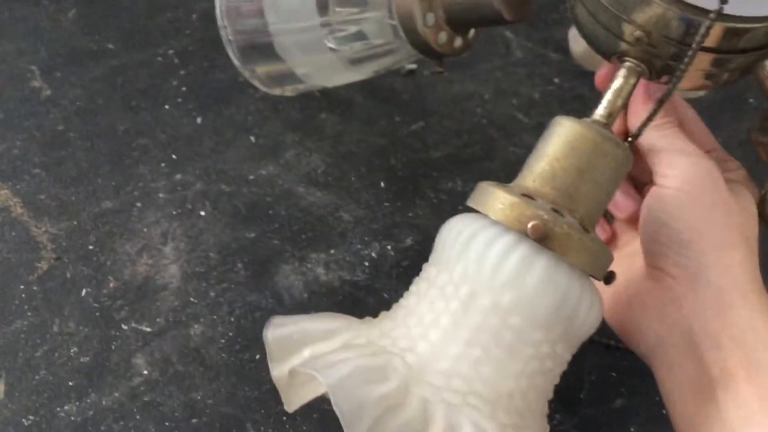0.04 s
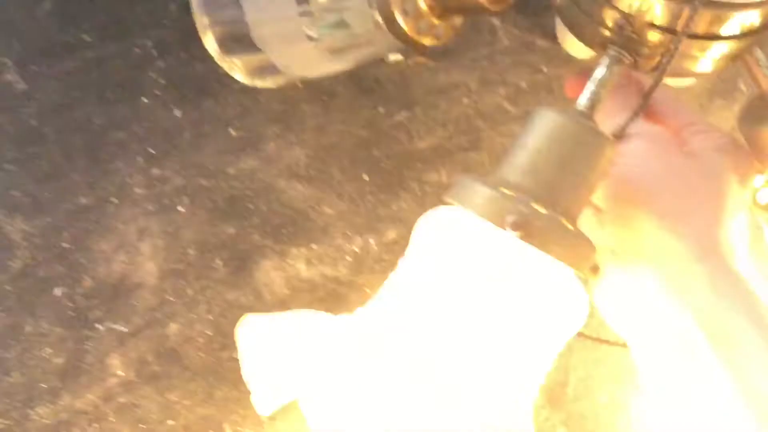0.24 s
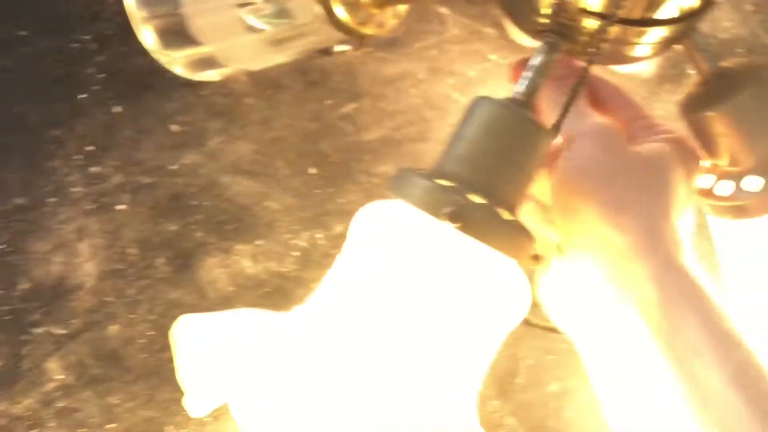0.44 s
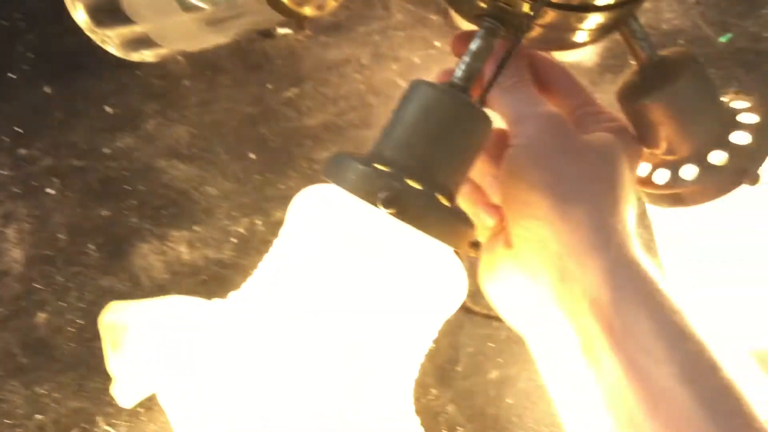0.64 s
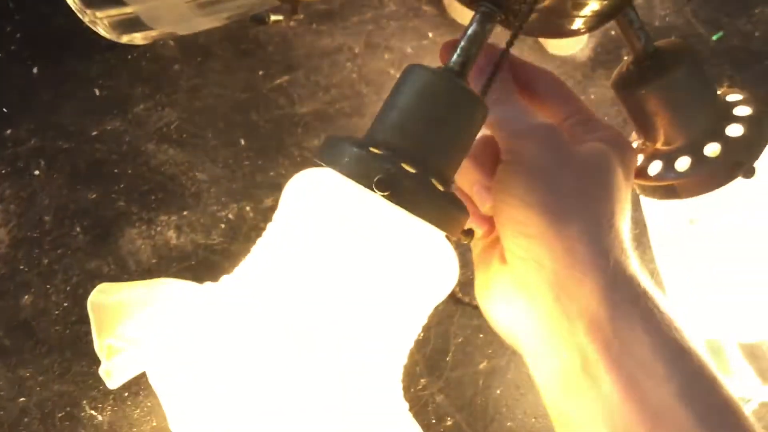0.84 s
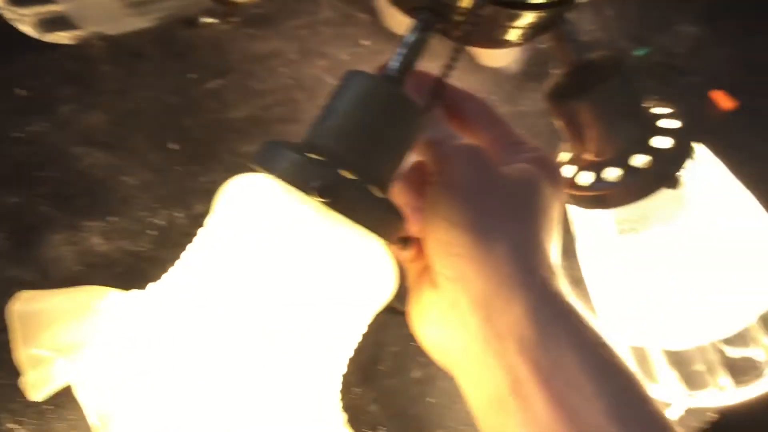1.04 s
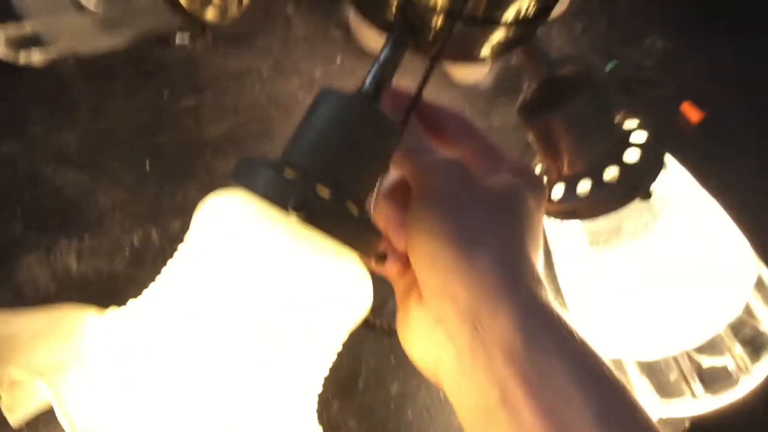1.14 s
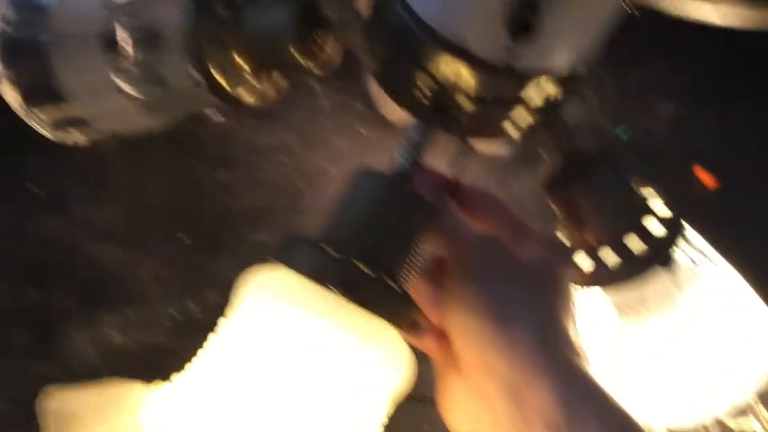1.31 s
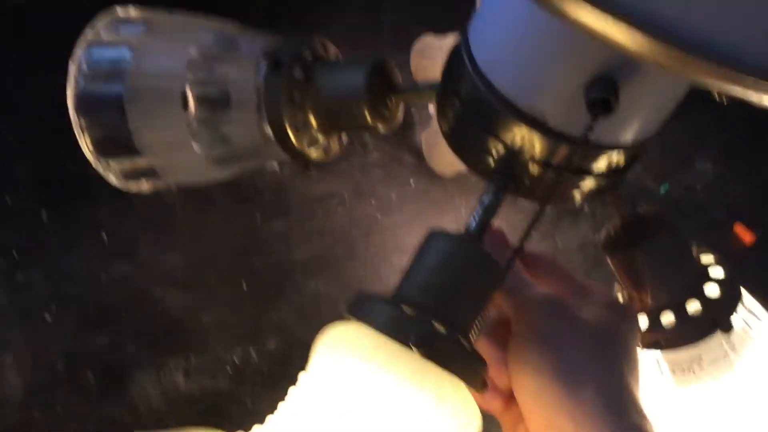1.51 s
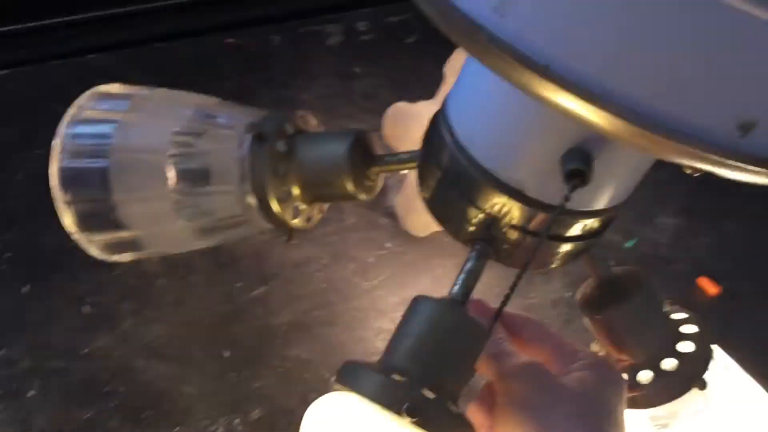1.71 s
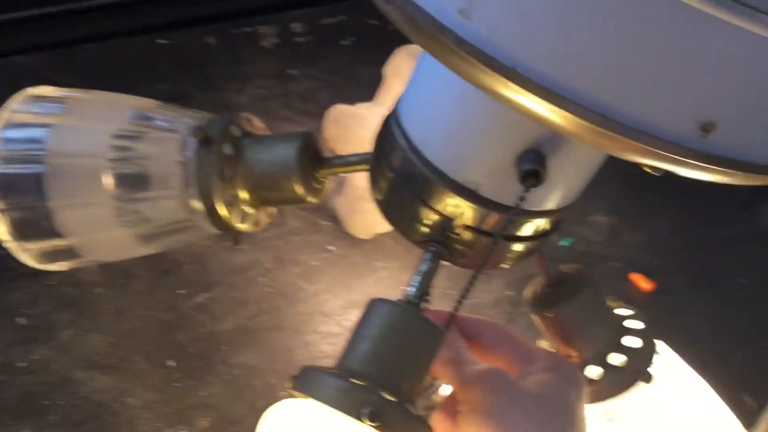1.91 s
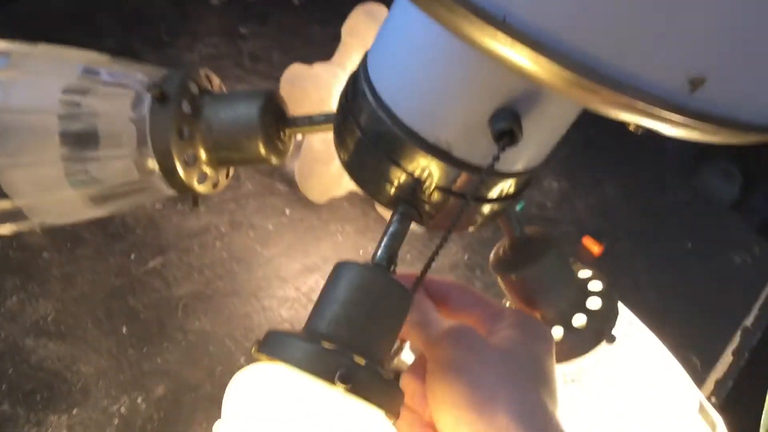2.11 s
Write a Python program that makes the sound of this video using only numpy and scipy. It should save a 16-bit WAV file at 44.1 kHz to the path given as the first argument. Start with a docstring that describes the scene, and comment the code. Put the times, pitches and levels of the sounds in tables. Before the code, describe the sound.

Close by in a small room, a pull-chain light switch gives a sharp metallic click and a slightly softer release click, each with a little chain rattle and faintly ringing glass shades. Quiet room tone follows.

```python
"""Chain beads tick over a metal collar, close by in a small room: a ceiling light's pull switch is tugged.
The ratchet snaps over, then springs back as the chain is let go. Each contact rings the small metal
parts, knocks the housing and leaves the glass shades singing faintly; the hardest snaps thump the mount.
A short echo follows. Underneath sit soft handling sounds, thin squeaks, a low room drone and faint hiss."""
import sys
import numpy as np
from scipy import signal
from scipy.fft import rfft, irfft
from scipy.io import wavfile
from scipy.ndimage import uniform_filter1d

SR = 44100
rng = np.random.default_rng(int(sys.argv[2]) if len(sys.argv) > 2 else 0)


def master(y):
    """Save y as 16-bit WAV."""
    cut = np.clip(np.atleast_2d(y).T, -1, 1)
    pcm = np.round(cut * 32767)  # scale
    wavfile.write(sys.argv[1], SR, pcm.astype(np.int16))


N = 94815
TIME = np.arange(N) / SR

# Mode, spectrum and hit levels are relative: they set the balance and stack with other gains.
# switch contacts: t/s, knock level/dB, knock treble/dB, low, middle and high ring level/dB, high ring f/Hz
CONTACTS = [ (0.0651, -27.5, -5, -27.5, -40.5, -33, 12800), (0.1409, -29.5, -25, -32, -38, -54, 12700),
            (0.159, -23, -10, -26, -22, -19, 12500), (0.1985, -12.5, -14, -20, -15, -19, 12520),
            (0.2140, -37.5, -13, -25.5, -37, -39, 13100), (0.2183, -23, -4, -24.5, -14, -23, 12660),
            (0.2272, -9, 8, -8, -14, 2, 12300), (0.2293, 2, -1, 8.5, 12.5, 11.5, 12740),
            (0.2316, -5, 11, 0.5, -2, -4, 12670), (0.4807, -27.5, -8, -19.5, -6.5, -26, 12840),
            (0.4932, -24, 6, -18, -19, -16, 12900), (0.5097, -29, -2, -7, -13, -14, 13000),
            (0.5131, -2.5, -1, -5.5, -13, -5, 12220), (0.519, -9, -6.5, -3, -13, -7, 13100),
            (0.6027, -24.5, -6, -17.5, -20.5, -36, 12800)]
# chain and collar modes, grouped as low, middle and high ring: f/Hz, level/dB, t60/s
METAL_MODES = [
    [(3601, -23.5, 0.02), (3705, -31.5, 0.02096), (3940, -42, .02)],
    [(6333, -32.5, 0.01393), (6486, -37, .014), (7410, -49.5, .012)],
    [(12340, -30.5, 0.0069), (12600, -20.5, 0.013), (13110, -25.5, 0.0091), (14240, -37, .01)],
]
# bead chatter while the chain is taut: centre t/s, half length/s, level/dB
CHATTER_SWELLS = [(0.17, 0.02, -52), (0.215, 0.024, -34.5), (0.485, 0.015, -37.5), (0.521, 0.012, -19)]
# tone of the chatter: low, middle and high ring level/dB
CHATTER_RING_DB = [2, -5, -7]
# echo send of the near, fairly dry chain: low, middle and high ring level/dB
RING_SEND_DB = [-13, -6.5, -13]
# housing and lamp arm modes: f/Hz, level/dB, t60/s
HOUSING_MODES = [(600, -51, .1), (825, -47.5, 0.12), (984, -45.5, .19), (1067, -43, .08),
                 (1264, -47.5, 0.18), (1447, -42, .11), (1543, -50, 0.17), (1657, -39, 0.043),
                 (1835, -48, 0.2), (2086, -45.5, 0.078), (2150, -43.5, 0.077), (2240, -49.5, .09),
                 (2493, -45.5, 0.16), (3205, -50.5, 0.094)]
# dry crack of a knock: f/Hz, level/dB
CRACK_SPECTRUM = [(300, -10.5), (520, -15.5), (690, -5), (880, -1), (1070, 3), (1340, -2.5), (1670, 7.5),
                  (1970, -6), (2240, 1), (2900, -12), (3550, -5), (4500, -18), (5200, -9), (7000, -15.5),
                  (9500, -20), (11900, -5.5), (14200, -13.5), (15600, -16)]
# jolts of the whole fixture: t/s, level/dB
JOLTS = [(0.2, -36.5), (0.2315, -26.5), (0.5145, -37.5)]
# ceiling mount modes: f/Hz, level/dB, t60/s
MOUNT_MODES = [(195.6, -5, 0.078), (223.4, -8.5, 0.138), (318, -14, 0.053), (385, -21, 0.13)]
# glass shade modes: f/Hz, level/dB, t60/s
SHADE_MODES = [(2860, -58.5, 0.2025), (3600, -57, .25), (3830, -54.5, 0.26), (4274, -59, 0.17),
               (6740, -70, 0.26)]
# colour of the room's echo: f/Hz, level/dB
ECHO_SPECTRUM = [(200, -5), (600, -1.5), (1500, -8), (2600, -3.5), (3300, 0.5), (3850, -7), (4600, -3),
                 (6500, -4), (9000, -0.5), (12700, -9), (15500, -3)]
# handling bumps: t/s, f/Hz, level/dB
BUMPS = [(0.466, 132, -40), (0.863, 133.4, -43.5), (1.925, 114.4, -45.5)]
# chain sliding through the fingers: centre t/s, half length/s, level/dB
SLIDE_SWELLS = [(0.16, 0.013, -79.5), (0.416, 0.072, -72)]
# colour of the slide: f/Hz, level/dB
SLIDE_SPECTRUM = [(1000, -20.5), (2500, -8), (3700, 4.5), (5400, 1), (7000, -16), (9300, -6), (11000, -15),
                  (15000, -12.5)]
# hand rustles: centre t/s, half length/s, level/dB
RUSTLE_SWELLS = [(1.3, 0.16, -75.5), (1.64, 0.18, -75)]
# colour of the rustle: f/Hz, level/dB
RUSTLE_SPECTRUM = [(500, -14), (1400, -2.5), (2000, 1), (2800, 2), (4000, -9), (5500, -7.5), (8000, -22)]
# thin squeaks: start t/s, length/s, start f/Hz, end f/Hz, level/dB
SQUEAKS = [(1.32, .14, 13150, 12140, -83), (1.521, .11, 14000, 14000, -84),
           (1.645, 0.1, 13600, 12200, -73.5)]
# low room resonances: f/Hz, half width/Hz
DRONE_BANDS = [(80, 15), (132, 3.5), (213, 25)]
# drone fader moves: t/s, then level/dB for each band
DRONE_LEVELS = [(0, -63, -52.5, -54), (0.35, -53, -52, -64), (0.48, -60, -47.5, -49.5),
                (0.6, -59.5, -54, -59.5), (0.95, -60, -50.5, -58), (1.2, -58, -56, -50),
                (1.38, -71, -60.5, -60), (1.579, -54, -54, -55.5), (1.8, -69.5, -75, -58.5),
                (2.15, -63.5, -70.5, -59.5)]
# colour of the room air: f/Hz, level/dB
AIR_SPECTRUM = [(25, -16), (55, -7), (100, 3), (260, -4), (360, -5), (510, -14.5), (660, -14), (810, -10.5),
                (890, -17), (1030, -7), (1200, -15.5), (1300, -12.5), (1500, -15), (1850, -23),
                (2300, -28.5), (2750, -27.5), (4000, -32), (5400, -31), (6000, -37), (6400, -33),
                (7400, -43), (8500, -34.5), (10300, -42.5), (13200, -37), (15200, -41.5)]
# colour of the hiss: f/Hz, level/dB
HISS_SPECTRUM = [(300, -24), (1500, 0.5), (2800, 0), (5000, -4.5), (7000, -9.5), (9000, -8), (11000, -12),
                 (13500, -7.5), (16000, -16)]
# hiss fader moves: t/s, level/dB
HISS_LEVELS = [(0, -72.5), (0.65, -75.5), (1.05, -78), (1.6, -77), (1.85, -78.5), (2.03, -78.5),
               (2.15, -65.5)]


def chain(beads_per_s=1100, scatter_db=4, chatter_tuning=0.91, high_ring_hz=12620):
    """Chattering beads and switch contacts ring the metal; one row each for low, middle and high ring."""
    beads = (rng.random(N) < beads_per_s / SR) * rng.choice([-1, 1], N)
    beads = beads * from_db(scatter_db * rng.standard_normal(N)) * swells(CHATTER_SWELLS)
    rings = np.array([from_db(db) * signal.fftconvolve(beads, metal_ping(modes, chatter_tuning))[:N]
                      for modes, db in zip(METAL_MODES, CHATTER_RING_DB)])
    for s, _, _, *ring_db, high_hz in CONTACTS:
        start = round(s * SR)
        for k, tuning in enumerate((1, 1, high_hz / high_ring_hz)):  # only the high ring is retuned
            ping = from_db(ring_db[k]) * metal_ping(METAL_MODES[k], tuning)
            rings[k, start:start + len(ping)] += ping
    return rings


def metal_ping(modes, tuning, rise_s=0.00096):
    """One hit on a group of metal modes: damped sines that swell over the moment of contact."""
    t = TIME[:3000]
    ping = sum((-1) ** k * from_db(db - 60 * t / t60) * np.sin(2 * np.pi * hz * tuning * t)
               for k, (hz, db, t60) in enumerate(modes))
    return ping * (1 - np.exp(-t / rise_s))


def housing(scatter_db=2, crack_db=-25, crack_rise_s=0.00024, shelf_hz=3740):
    """Every contact strikes the housing's modes and adds a dry crack, dull or bright."""
    times, knock_db, treble_db = np.transpose(CONTACTS)[:3]
    out = np.zeros(N)
    for k, (hz, db, t60) in enumerate(HOUSING_MODES):
        knocks = clicks(times, knock_db + db + scatter_db * rng.standard_normal(len(times)))
        out += (-1) ** k * ring(knocks, hz, t60)
    for start, db, treble in zip((times * SR).astype(int), knock_db, treble_db):
        colour = [(hz, level + treble / (1 + (shelf_hz / hz) ** 4)) for hz, level in CRACK_SPECTRUM]
        crack = from_db(crack_db + db) * dying_noise(colour, t60=0.042, slope=0.23, size=4096)
        attack = 1 - np.exp(-TIME[:len(crack)] / crack_rise_s)
        out[start:start + len(crack)] += crack * attack
    return out


def mount():
    """The hardest snaps thump the fixture against the ceiling."""
    jolts = clicks(*np.transpose(JOLTS))
    return sum(from_db(db) * ring(jolts, hz, t60) for hz, db, t60 in MOUNT_MODES)


def shades():
    """The glass shades pick up each knock and ring on faintly."""
    knocks = clicks(*np.transpose(CONTACTS)[:2])
    return sum(from_db(db) * ring(knocks, hz, t60) for hz, db, t60 in SHADE_MODES)


def room_echo(send, return_db=-8.5, predelay_s=0.0013, build_s=0.0022):
    """A short diffuse tail builds up just behind the direct sound."""
    tail = dying_noise(ECHO_SPECTRUM, t60=0.26, slope=0.08, size=24000)
    tail *= np.clip((TIME[:len(tail)] - predelay_s) / build_s, 0, 1)
    return from_db(return_db) * signal.fftconvolve(send, tail / np.linalg.norm(tail))[:N]


def bumps(rise_s=0.0066):
    """Dull handling thuds that swell and die within a few cycles."""
    out = 0
    for s, hz, db in BUMPS:
        age = np.maximum(TIME - s, 0)
        envelope = age / rise_s * np.exp(1 - age / rise_s)
        out += from_db(db) * envelope * np.sin(2 * np.pi * hz * age)
    return out


def friction():
    """Soft rubbing noise from the running chain and the moving hand."""
    return noise(SLIDE_SPECTRUM) * swells(SLIDE_SWELLS) + noise(RUSTLE_SPECTRUM) * swells(RUSTLE_SWELLS)


def squeaks(waver_hz=89):
    """Three faint, very high, wavering whistles; the first and last sag in pitch as they end."""
    lowpass = signal.butter(2, waver_hz, fs=SR, output="sos")
    out = 0
    for s, length, start_hz, end_hz, db in SQUEAKS:
        progress = np.clip((TIME - s) / length, 0, 1)
        waver = rms_one(signal.sosfilt(lowpass, rng.standard_normal(N)))
        phase = 2 * np.pi * np.cumsum(start_hz + (end_hz - start_hz) * progress ** 3) / SR
        out += from_db(db) * np.sin(np.pi * progress) * waver * np.sin(phase)
    return out


def drone():
    """Low room resonances: three narrow noise bands, each riding its own fader."""
    times, *faders = np.transpose(DRONE_LEVELS)
    hz = np.fft.rfftfreq(N, 1 / SR)
    out = 0
    for (centre_hz, half_width_hz), db in zip(DRONE_BANDS, faders):
        band = irfft(rfft(rng.standard_normal(N)) / (1 + ((hz - centre_hz) / half_width_hz) ** 2), N)
        levelled = band / np.sqrt(uniform_filter1d(band ** 2, size=8000))
        out += levelled * from_db(np.interp(TIME, times, db))
    return out


def room_tone(air_db=-60):
    """A steady bed of air, and a faint hiss that swells at the end."""
    hiss_gain = from_db(np.interp(TIME, *np.transpose(HISS_LEVELS)))
    return from_db(air_db) * noise(AIR_SPECTRUM) + hiss_gain * noise(HISS_SPECTRUM)


def from_db(db):
    """Decibels to gain."""
    return 10 ** (np.asarray(db) / 20)


def rms_one(x):
    """Scale to an rms of 1."""
    return x / np.sqrt(np.mean(x ** 2) + 1e-20)


def swells(rows):
    """Bell-shaped rises and falls of gain."""
    return sum(from_db(db) * np.exp(-((TIME - s) / half) ** 2) for s, half, db in rows)


def clicks(times, db):
    """One impulse per hit."""
    out = np.zeros(N)
    np.add.at(out, np.round(times * SR).astype(int), from_db(db))
    return out


def ring(hits, hz, t60):
    """One resonant mode: a unit click starts a decaying sine of height 1."""
    decay, step = from_db(-60 / (t60 * SR)), 2 * np.pi * hz / SR
    return signal.lfilter([0, np.sin(step)], [1, -2 * decay * np.cos(step), decay ** 2], hits + 1e-18)


def noise(spectrum, size=N):
    """Noise of rms 1, coloured by an EQ curve drawn on a log-frequency axis."""
    hz = np.fft.rfftfreq(size, 1 / SR)
    curve_hz, curve_db = np.transpose(spectrum)
    eq = from_db(np.interp(np.log(hz + 1e-9), np.log(curve_hz), curve_db))
    return rms_one(irfft(rfft(rng.standard_normal(size)) * eq, size))


def dying_noise(spectrum, t60, slope, size):
    """A noise burst whose half-octave bands die faster towards the treble; t60 is in seconds at 1 kHz."""
    bins, hz = rfft(noise(spectrum, size)), np.fft.rfftfreq(size, 1 / SR)
    edges = np.geomspace(140, 18000, 15)
    out = np.zeros(size)
    for low, high in zip(edges, edges[1:]):
        band = irfft(bins * ((hz >= low) & (hz < high)), size)
        band_t60 = t60 * (np.sqrt(low * high) / 1000) ** -slope
        out += band * from_db(-60 * TIME[:size] / band_t60)
    return out


def scene():
    """The mono mix: the switch up front, its echo behind, the background below."""
    metal = chain()
    body = housing() + shades() + mount()
    echo = room_echo(body + from_db(RING_SEND_DB) @ metal)
    background = friction() + squeaks() + bumps() + drone() + room_tone()
    return (metal.sum(axis=0) + body + echo + background)[None]


def record(dry):
    """The microphone drops the deep bass, and the top is cut steeply."""
    low_cut_hz, high_cut_hz = 42, 15800
    thinned = signal.sosfilt(signal.butter(2, low_cut_hz, "high", fs=SR, output="sos"), dry)
    return signal.sosfilt(signal.ellip(10, .2, 80, high_cut_hz, fs=SR, output="sos"), thinned)


dry = scene()
out = record(dry)
master(out)
```